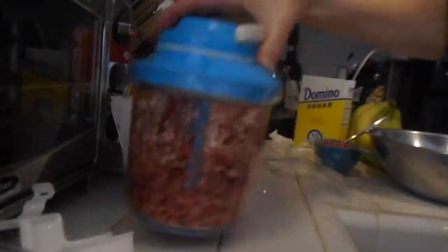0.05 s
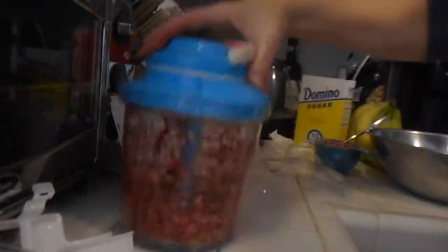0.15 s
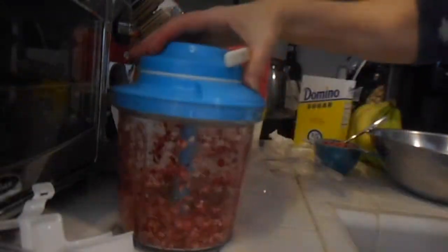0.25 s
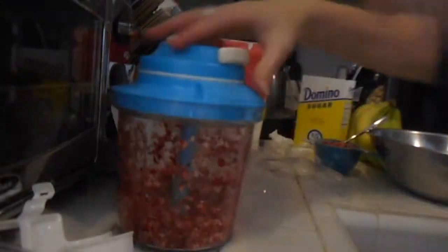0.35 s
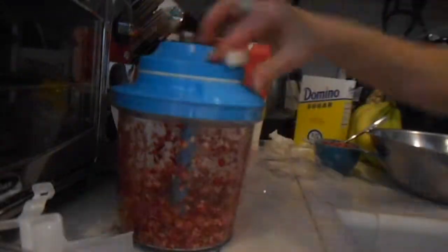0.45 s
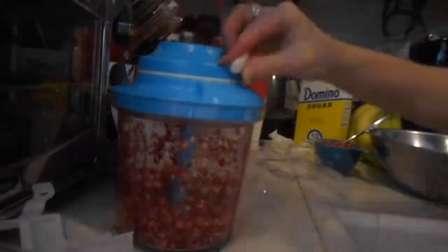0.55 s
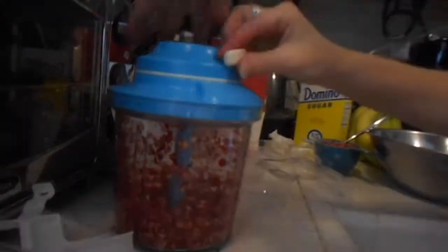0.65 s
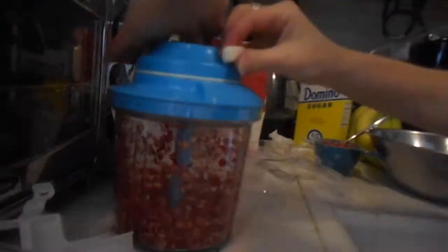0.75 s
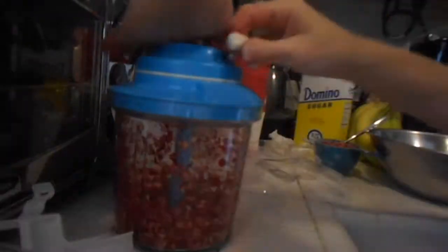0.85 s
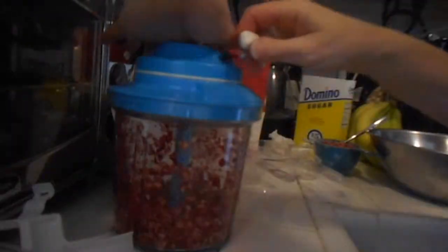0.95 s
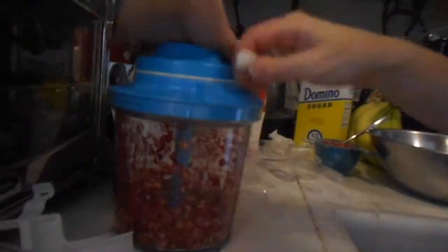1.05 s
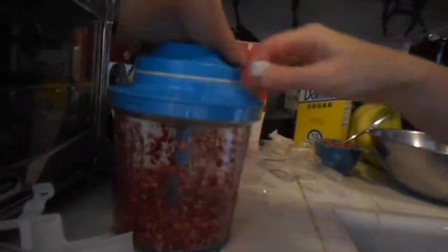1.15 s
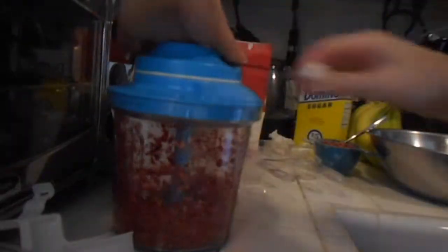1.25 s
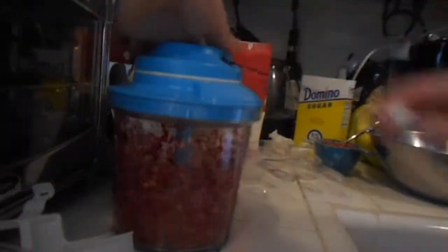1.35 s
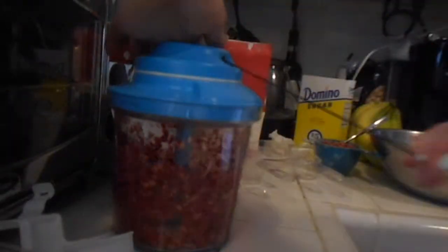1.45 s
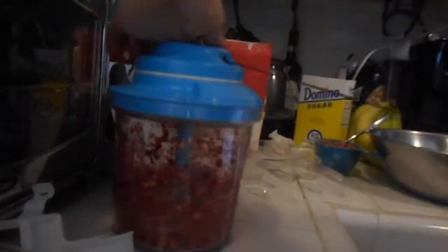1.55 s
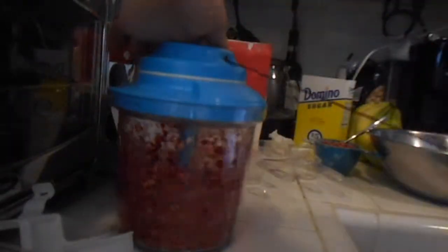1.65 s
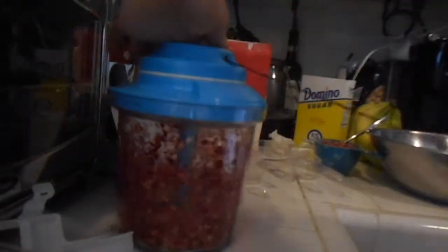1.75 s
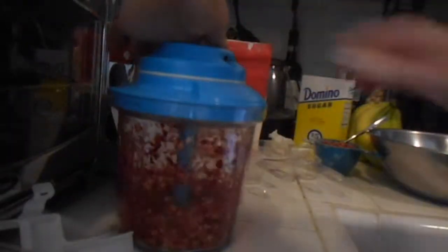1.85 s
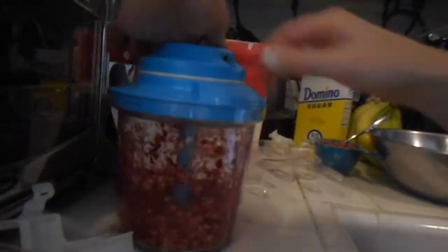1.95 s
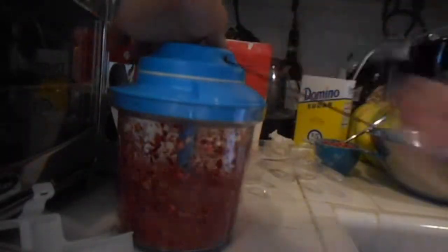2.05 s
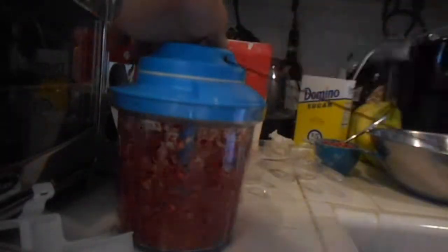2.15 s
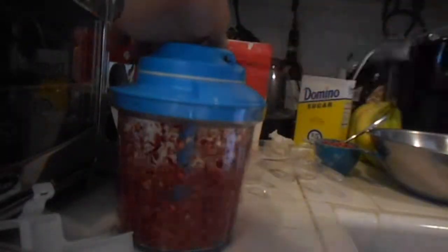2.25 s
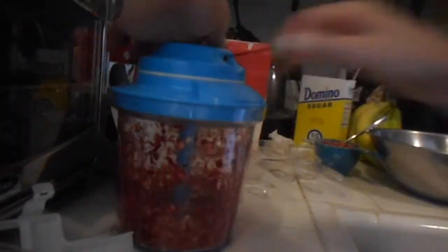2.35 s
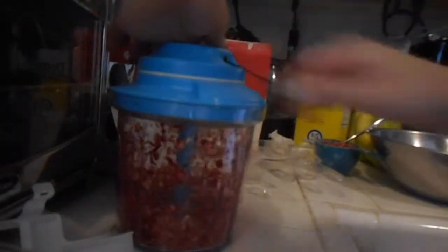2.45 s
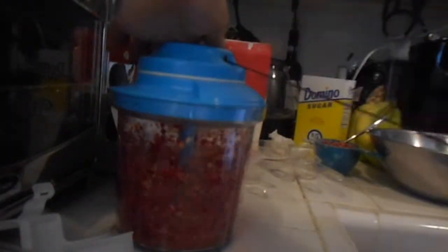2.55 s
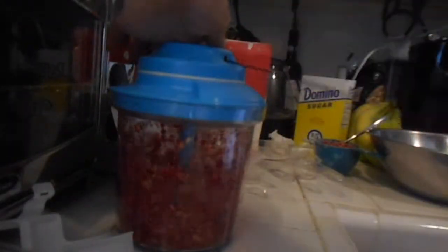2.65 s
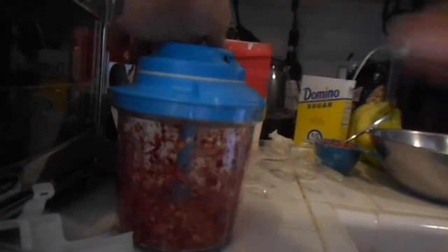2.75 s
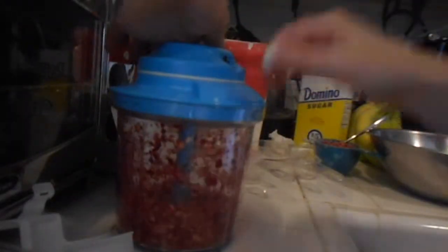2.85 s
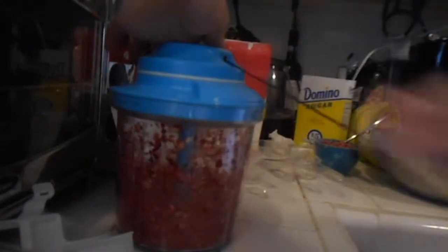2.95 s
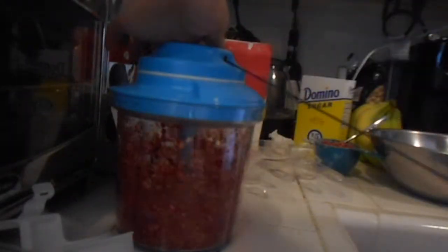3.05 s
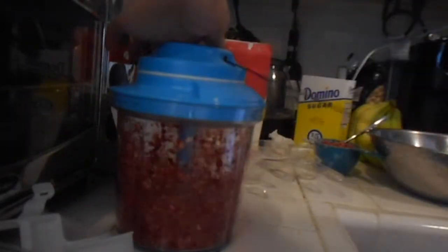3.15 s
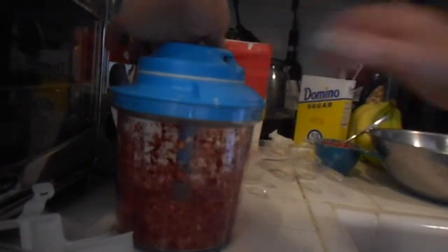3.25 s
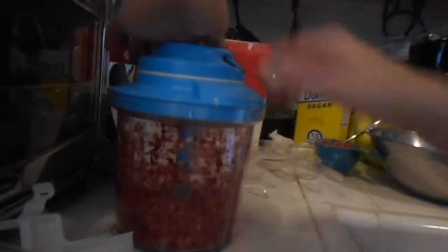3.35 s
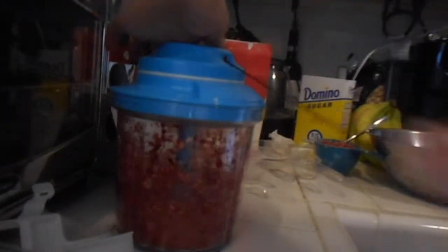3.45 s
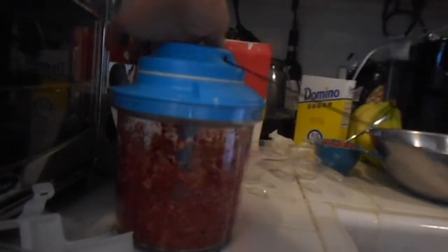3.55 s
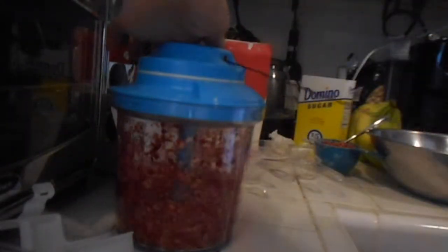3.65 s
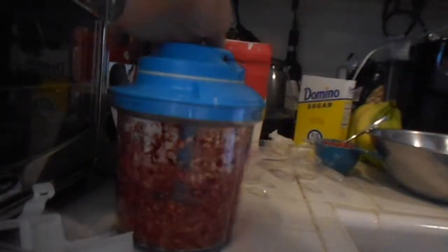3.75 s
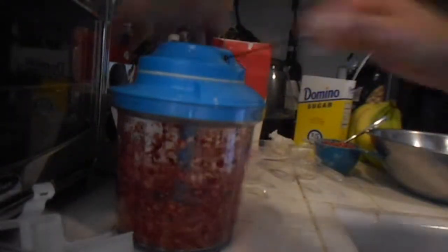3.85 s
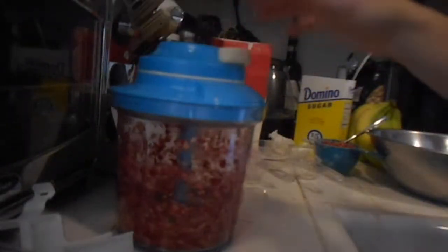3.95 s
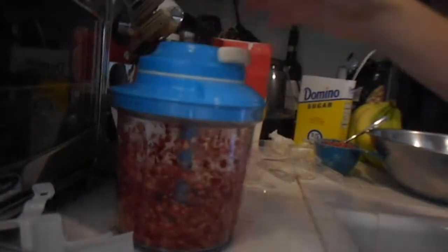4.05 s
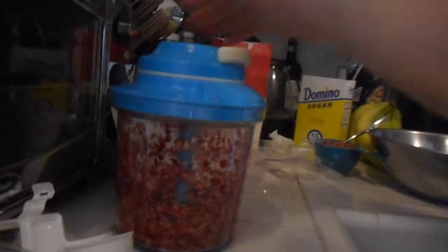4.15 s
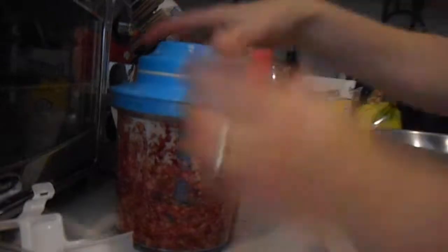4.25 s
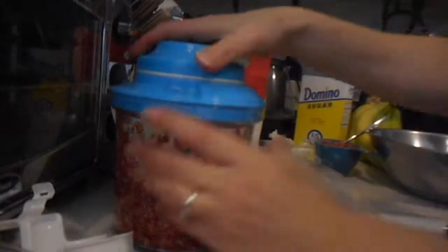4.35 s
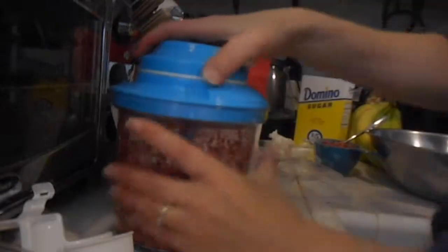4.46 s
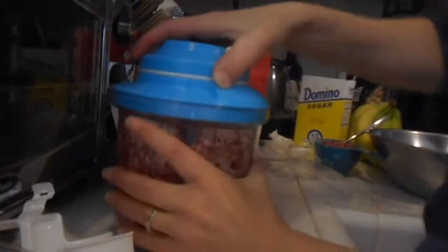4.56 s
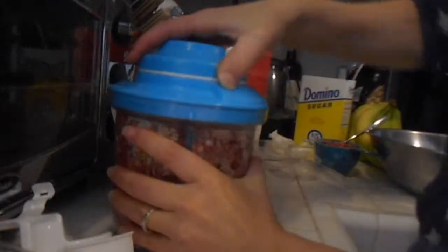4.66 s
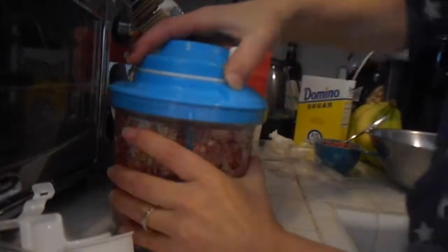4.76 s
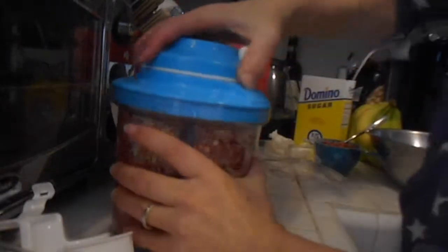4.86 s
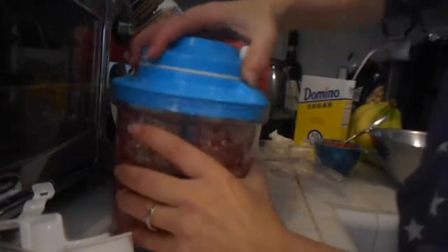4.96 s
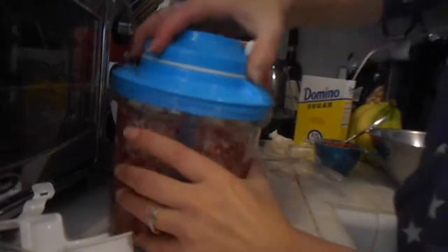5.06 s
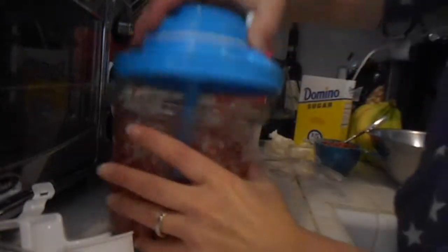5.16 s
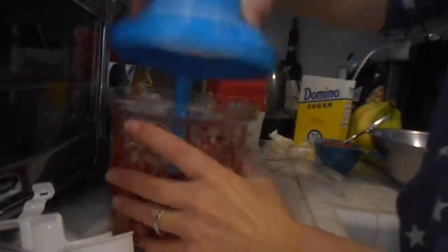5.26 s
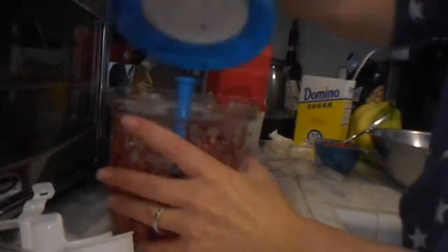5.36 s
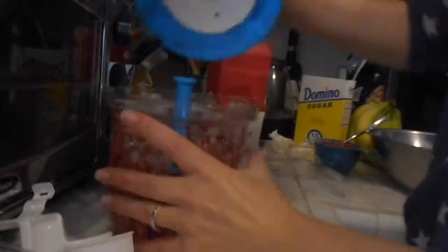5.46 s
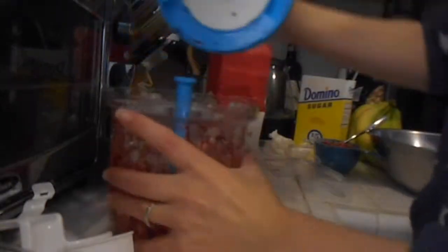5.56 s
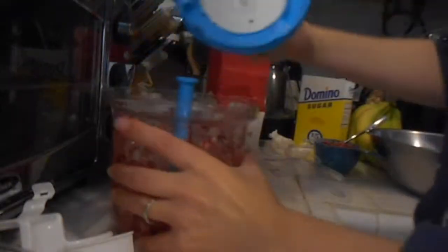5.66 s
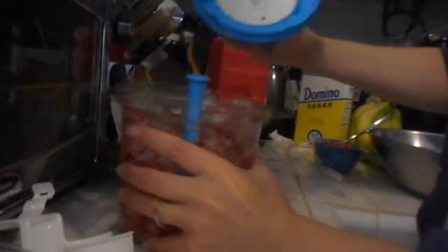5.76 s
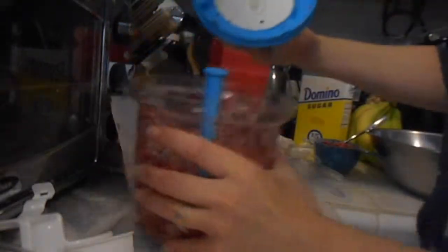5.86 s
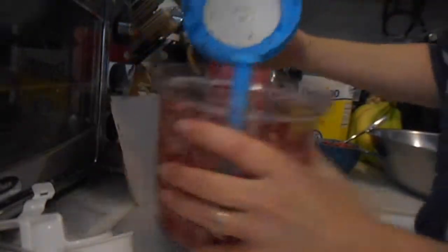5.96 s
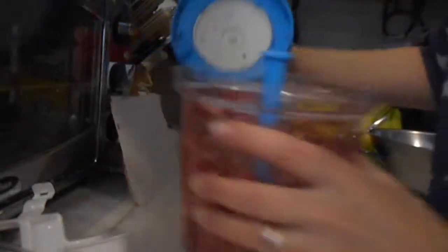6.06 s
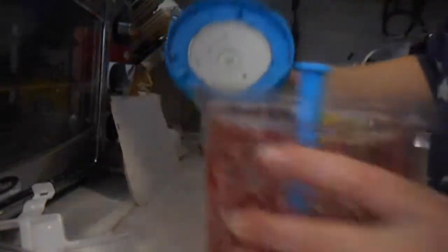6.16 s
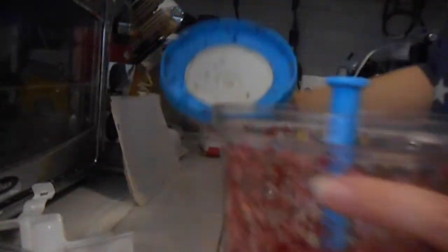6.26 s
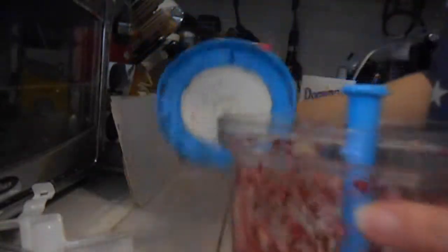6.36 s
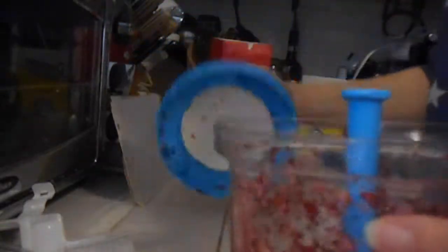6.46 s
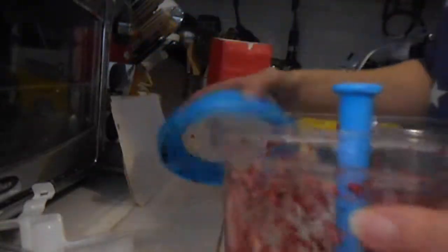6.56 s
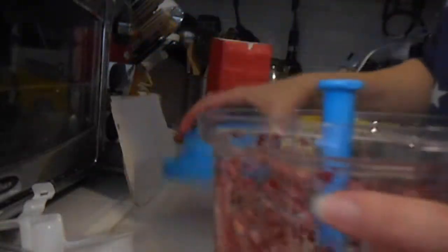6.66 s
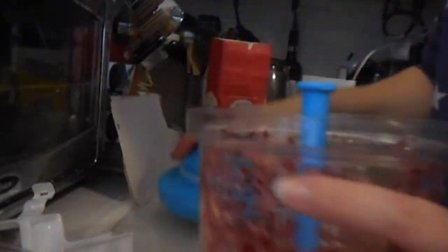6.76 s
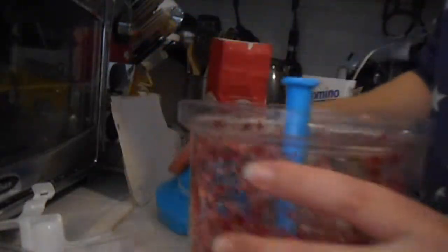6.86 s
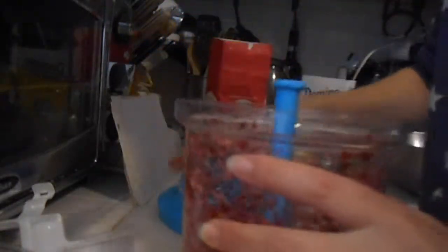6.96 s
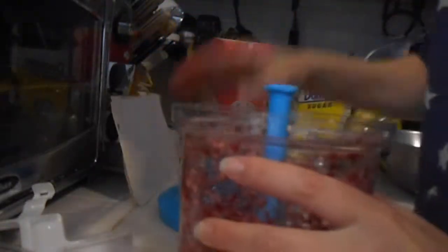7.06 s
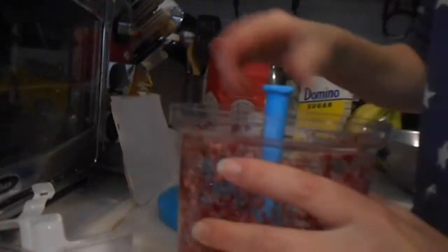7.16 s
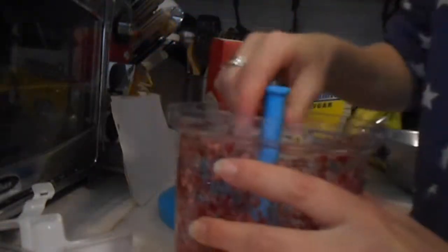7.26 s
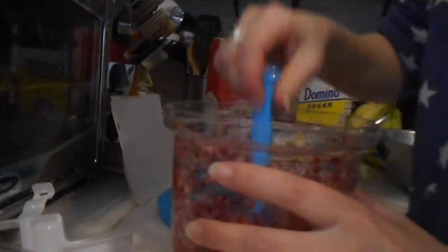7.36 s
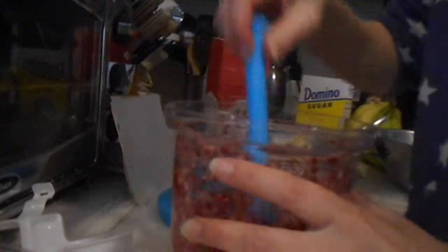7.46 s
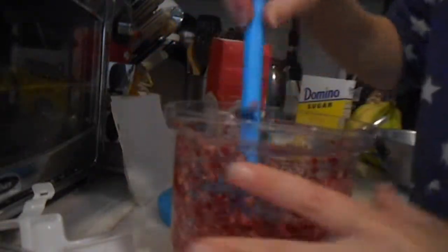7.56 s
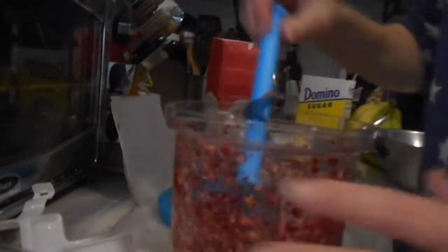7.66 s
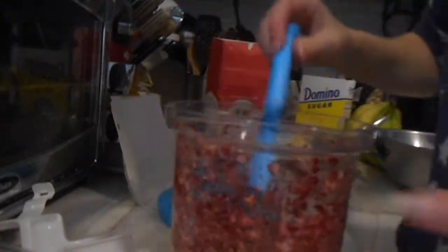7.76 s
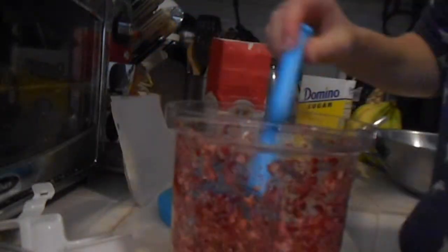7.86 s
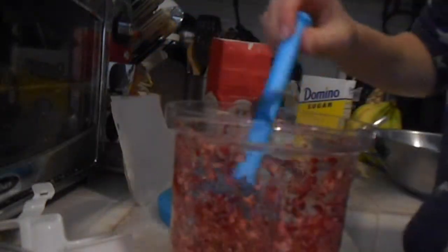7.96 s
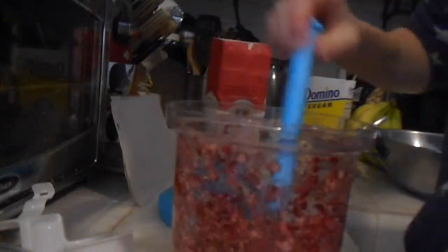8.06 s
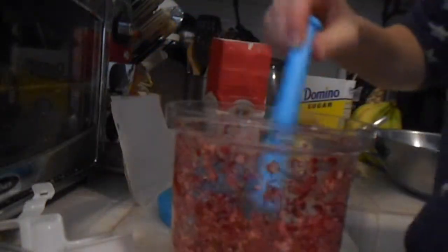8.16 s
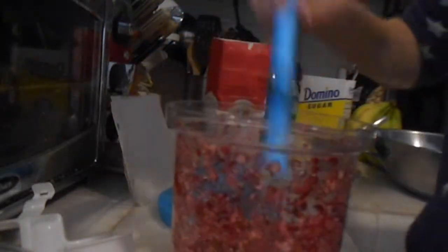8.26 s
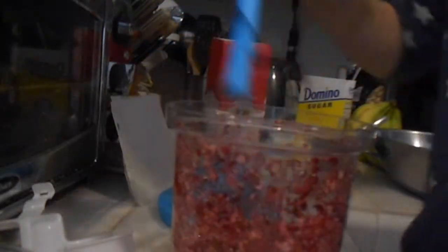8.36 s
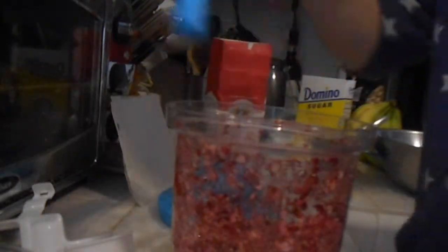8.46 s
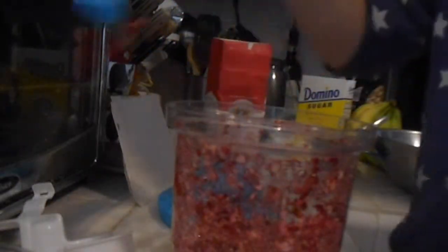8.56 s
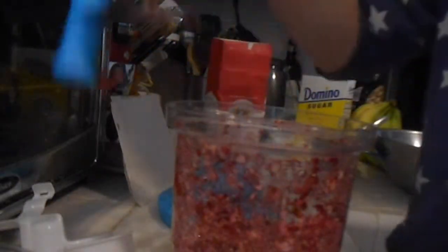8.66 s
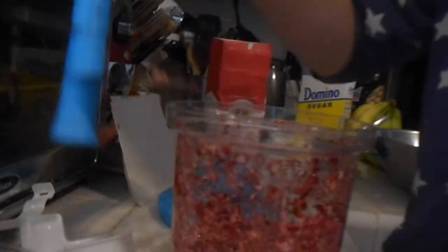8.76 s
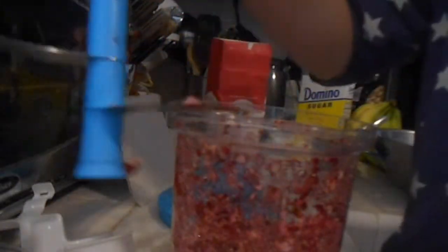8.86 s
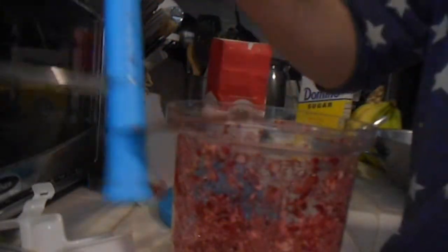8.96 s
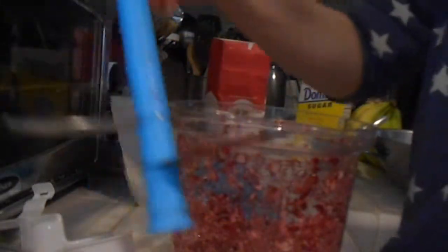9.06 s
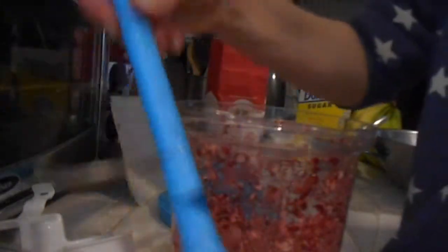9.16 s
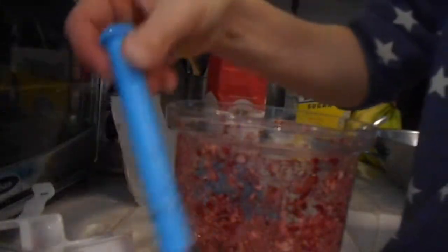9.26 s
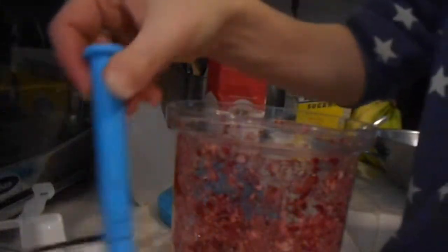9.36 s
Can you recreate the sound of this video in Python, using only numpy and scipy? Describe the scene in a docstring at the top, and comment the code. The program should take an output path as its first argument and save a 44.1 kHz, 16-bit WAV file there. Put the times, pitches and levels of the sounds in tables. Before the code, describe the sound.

Close microphone in a small quiet kitchen. A plastic pull-cord chopper is set down with a hard knock and its handle clicks. Five fast pulls give wet, gritty whirring bursts, each followed by a clattering ratchet rewind. The lid comes off with a hollow pop, is laid down with loud clacks, then the spindle raps the bowl rim seven times.

```python
"""Pull-cord food chopper

A chopper stands on a tiled kitchen counter and is pulled five times: random grains of berry hit the wall as the
blades whirl, then the cord winds back over a rattling ratchet of clicks and decaying tones. The lid is twisted off
and put down with knocks and a hollow boom, and the spindle is tapped clean on the ringing rim of the plastic bowl.
Filtered noise makes the rubbing hands and the quiet; a small room and a close microphone with a limiter complete it."""
import sys
import numpy as np
from scipy import signal
from scipy.fft import rfft, irfft
from scipy.io import wavfile
from scipy.ndimage import uniform_filter1d, minimum_filter1d, map_coordinates

SR = 44100
rng = np.random.default_rng(int(sys.argv[2]) if len(sys.argv) > 2 else 0)


def to_wav(s):
    """Save 16-bit WAV."""
    ch = np.atleast_2d(s).T  # columns
    pcm = np.round(np.clip(ch, -1, 1) * 32767)  # PCM
    wavfile.write(sys.argv[1], SR, pcm.astype(np.int16))


N = 415422
T = np.arange(N) / SR  # time in the scene, in s
AGE = T[:SR // 3]  # time since a blow, in s

# In all tables t60 is the time a sound takes to fall by 60 dB.
# pulls of the cord, the first in two tugs: (full speed at [s], hold [s], level [dB], run-up [dB per s])
PULLS = [(1.335, 0.13, -27, 111.5), (1.592, 0.13, -25, 257), (2.093, 0.076, -24, 399.5),
         (2.556, 0.081, -23, 332.5), (3.031, 0.08, -25.5, 306), (3.496, 0.13, -26, 321.5)]
# the cord winds back between a catch and a stop: (catch [s], stop [s], rattle level [dB])
REWINDS = [(1.779, 2.033, -27), (2.262, 2.478, -30), (2.723, 2.94, -29.5), (3.196, 3.434, -26.5),
           (3.694, 3.985, -28)]
# the pawl catches, the cord snags and stops, at last the handle snaps home:
# (time [s], level [dB], brightness [dB per band], ring [Hz], t60 [s])
CLACKS = [(1.783, -21, -3, 2110, 0.038), (1.791, -23, -3, 2760, 0.066), (1.804, -24, -3, 4480, 0.045),
          (1.823, -29, -2.5, 1385, 0.045), (1.849, -27.5, -3.5, 2620, 0.095),
          (1.859, -26, 0.5, 2560, 0.036), (1.868, -26.5, -1, 2460, 0.062), (1.892, -27, -5.0, 1980, 0.034),
          (1.899, -29.5, 1, 2000, 0.054), (1.924, -31, 0, 2130, 0.054), (1.952, -38, 4.5, 4810, 0.045),
          (1.966, -38, -3, 2100, 0.034), (1.998, -37, 0, 3250, 0.064), (2.031, -23.5, -1, 2830, 0.047),
          (2.261, -24, -1, 2070, 0.022), (2.289, -33.5, -3, 4500, 0.056), (2.302, -30.5, 2.0, 1850, 0.055),
          (2.336, -26.0, -2.5, 2110, 0.09), (2.366, -33, 4.5, 4300, 0.045), (2.392, -36, 1.5, 3140, 0.036),
          (2.428, -34, -3, 2760, 0.053), (2.447, -36, -2, 3140, 0.035), (2.457, -33, 0, 3060, 0.039),
          (2.482, -27.5, -1.5, 2800, 0.043), (2.495, -32.5, -6, 3130, 0.032),
          (2.725, -20.0, -1.5, 2300, 0.038), (2.758, -29, 2.5, 4780, 0.026), (2.776, -29, -2, 4670, 0.045),
          (2.79, -27.5, -1, 2660, 0.058), (2.837, -32.0, -3, 1870, 0.081), (2.86, -31, -1.5, 2550, 0.041),
          (2.875, -37.5, 4, 3100, 0.035), (2.89, -34.5, -3.5, 2560, 0.063), (2.901, -29, 1.5, 2550, 0.045),
          (2.948, -24, 0, 4620, 0.037), (3.072, -26, -4.5, 2720, 0.045), (3.192, -20.5, -1.0, 2410, 0.034),
          (3.206, -29, -10.5, 2010, 0.024), (3.22, -30.5, -9, 1020, 0.045),
          (3.246, -28.0, -1.5, 2460, 0.041), (3.259, -34, -2.5, 2570, 0.045), (3.267, -31, -1, 2560, 0.045),
          (3.308, -35, 1, 2750, 0.031), (3.322, -34.5, -0.5, 4620, 0.068), (3.365, -33, 5.5, 5220, 0.034),
          (3.384, -36.5, 1.5, 4740, 0.039), (3.422, -24.5, -1.0, 3050, 0.04), (3.703, -17, -3, 2110, 0.028),
          (3.728, -31, -4.5, 1040, 0.045), (3.738, -29.5, -6, 1860, 0.034), (3.757, -31, 4.5, 4450, 0.029),
          (3.771, -30.5, -6.5, 2080, 0.026), (3.797, -27, -4, 4440, 0.045),
          (3.816, -24.5, 1.5, 4550, 0.042), (3.844, -36.5, 8, 3800, 0.045), (3.855, -30.5, 1, 4720, 0.04),
          (3.897, -30, 1.5, 2870, 0.065), (3.914, -33.5, 1, 2150, 0.051), (3.926, -36, 1, 3720, 0.066),
          (3.944, -34, -5.5, 1840, 0.069), (3.968, -31.5, -3, 2920, 0.096), (3.99, -20.5, 3, 4050, 0.056),
          (4.003, -17.5, 2.5, 2550, 0.045), (4.013, -23.5, 2, 3880, 0.042)]
# the pull handle snaps against its seat: (time [s], pitch ratio [1], level [dB])
SNAPS = [(0.35, 0.99, -23), (4.353, 0.93, -27)]
# knocks of bowl, handle and lid, and of berry bits striking the wall during the pulls: (time [s], level [dB],
# strongest frequency [Hz], t60 [s], bowl ring relative to knock [dB], rebound relative to knock [dB])
KNOCKS = [(0.234, -12.5, 970, 0.039, -9, -11), (0.236, -15.5, 3530, 0.026, -9, -9.5),
          (0.26, -31.5, 2600, 0.058, -21, -2.5), (0.307, -37, 3500, 0.092, -17, -5.5),
          (0.694, -39, 2950, 0.048, 4, -26), (0.9, -26.5, 1800, 0.02, -2, 0.5),
          (1.357, -21.5, 1500, 0.14, -22, -10), (1.463, -31, 2400, 0.023, -13, -19),
          (1.585, -30, 2200, 0.029, -9, -16), (1.658, -22, 1570, 0.064, -8, -2),
          (4.417, -43, 2700, .015, -18, -7), (4.45, -38, 2570, 0.023, -16, -25),
          (4.579, -35.5, 2000, 0.016, -21, -18), (4.864, -22, 1060, 0.05, -8.5, -0.5),
          (4.883, -21, 2200, 0.028, -12.5, -15), (4.901, -32.5, 2400, 0.027, -11, -16),
          (5.106, -41.5, 696, 0.064, -3.5, -7.5), (5.171, -29.5, 1050, 0.15, -1.5, -9),
          (5.251, -5.5, 680, 0.043, -12, -18.5), (5.272, -30, 1000, 0.15, -18, -14),
          (5.349, -41, 600, 0.039, -20, -32), (5.751, -44, 2270, 0.051, -25, 2),
          (6.491, -41, 1660, 0.17, -22.5, -9.5), (6.623, -37, 1600, 0.045, -12, -11),
          (6.63, -27, 1750, 0.03, -21, -9), (6.649, -35, 1900, .04, -11, -16.5),
          (6.657, -29, 1800, 0.061, -16, -13), (6.924, -8, 2050, 0.04, -4.5, -8),
          (6.97, -4.5, 3450, 0.023, 7, -5.5), (7.008, -24.5, 2010, 0.089, 6.5, -5.5),
          (7.058, -33.5, 1310, 0.11, 6, -4.5), (7.114, -37, 1500, 0.046, 3, -19),
          (7.385, -48, 800, 0.085, -9, -10), (7.425, -45, 1290, 0.028, -2, -17),
          (7.476, -44.5, 440, .06, -7, -5), (7.535, -46, 750, 0.025, -5.5, -3),
          (7.583, -34.5, 2750, 0.022, 14, -12)]
# middle of each band of a knock: (frequency [Hz])
KNOCK_BANDS_HZ = (250, 750, 2400, 6000)
# single hollow tones as bowl and lid meet the counter and each other:
# (time [s], pitch [Hz], level [dB], t60 [s])
THUDS = [(0.232, 304, -7, 0.02), (0.236, 193, -43, 0.24), (0.24, 1285, -10, 0.039),
         (0.9, 491, -26.5, 0.047), (4.873, 307, -9, 0.03), (4.94, 258, -39, 0.1),
         (5.172, 306, -20.5, 0.056), (5.25, 50.4, -34, 0.06), (5.347, 524, -21, 0.044),
         (6.925, 948, -3, 0.041), (6.972, 660, -16, 0.066), (6.978, 495, -25, 0.058),
         (7.008, 1590, -19, 0.09), (7.058, 532, -32, 0.088), (7.388, 477, -28, 0.029),
         (7.473, 243, -30.5, 0.035), (7.583, 156, -49, 0.18)]
# the lid coming free thumps the air in the bowl: (time [s], level [dB])
POPS = [(5.252, -1)]
# spindle taps on the rim: (time [s], low [dB], middle [dB], crack [dB], treble [dB], wall pitch [Hz], wall [dB])
TAPS = [(7.785, -33, -23.5, -26, -35.5, 455, -23.5), (7.848, -30, -22.5, -19.5, -30.5, 532, -23),
        (7.879, -47.5, -35, -34, -46.5, 660, -31), (8.008, -28, -17.5, -15.5, -24, 655, -25.5),
        (8.089, -25, -18, -19.5, -29.5, 647, -12), (8.178, -25.5, -14.5, -17.5, -19, 645, -9.5),
        (8.257, -26, -21, -21.5, -29, 648, -14.5)]
# fingers brush the lid, and the lid scrapes off the bowl: (time [s], rise time [s], level [dB])
SCUFFS = [(0.502, 0.016, -39.5), (0.533, 0.011, -38.5), (0.561, 0.0041, -33), (0.744, 0.032, -54),
          (0.975, 0.0059, -41.5), (4.402, 0.019, -41), (4.549, 0.0068, -39.5), (5.274, .025, -44.5),
          (5.346, 0.0047, -42.5), (5.504, 0.023, -45), (5.591, 0.026, -45.5)]
# hands sliding over plastic: (time [s], length [s], level [dB], brightness [dB per band])
RUBS = [(0.35, 0.12, -64, 4), (0.516, 0.13, -54, 3), (0.749, 0.18, -54, -2), (1.035, 0.51, -52.5, 2),
        (4.041, 0.18, -55, 4.5), (4.397, 0.25, -48.5, 1.5), (4.737, 0.5, -52.5, 1.5),
        (5.17, 0.18, -53.5, -8), (5.567, 0.35, -60, 7), (7.094, 0.089, -53, 3), (7.286, 0.072, -53, 7),
        (7.45, 0.02, -56.5, 7), (7.56, 0.37, -59, -4), (8.04, 0.27, -53, 0.5), (8.38, 0.16, -56.5, -4.5),
        (8.585, 0.058, -57.5, -1.5)]
# the spindle comes down into the pulp: (time [s], level [dB])
SWISHES = [(9.108, -41.5)]

# ringing tones of the lid that houses the ratchet: (frequency [Hz], level [dB], t60 [s])
LID_MODES = [(962, -9, 0.032), (1170, -0.5, 0.042), (1407, -12, 0.069), (1721, -5, 0.0077),
             (2094, 7, 0.045), (2704, 1.5, 0.039), (3010, -5.5, 0.028), (3950, -9.5, 0.029),
             (3960, -14.5, 0.019), (4284, 7, 0.023), (4565, 10, 0.024), (4950, 10, 0.0245),
             (5940, -13, 0.03), (8470, -3.5, 0.03)]
# ringing tones of the small hard handle: (frequency [Hz], level [dB], t60 [s])
HANDLE_MODES = [(2170, -4.5, 0.06), (2350, -2, 0.04), (2960, -5, 0.03), (2920, -5, .025), (3440, -2, 0.02),
                (3840, 0, 0.022), (4240, -2.5, 0.023), (5050, -7, 0.027), (5450, -20, 0.026),
                (6800, -26, 0.021)]
# ringing tones of the filled bowl: (frequency [Hz], level [dB], t60 [s])
BOWL_MODES = [(417.6, -17.5, 0.11), (549, -1, 0.075), (659.4, -1.5, 0.08), (1080, -1.5, 0.032),
              (1184, 0, 0.052), (1645, -1, 0.065), (2228, 0.5, 0.028), (2340, -6, 0.039),
              (2687, 0.5, 0.041), (2950, -4.5, 0.022), (3220, -11.5, .025), (3584, -3, 0.036),
              (4880, -11, 0.035)]
# air and wall of the open bowl: (frequency [Hz], level [dB], t60 [s])
CAVITY_MODES = [(400, -17.5, 0.045), (533, 5, 0.042), (617, -9, 0.02), (753, -20.5, .055),
                (1010, -17.5, .08), (1238, -15, 0.099), (1426, -19, 0.03)]
# the counter drums under the tapped bowl: (frequency [Hz], level [dB], t60 [s])
COUNTER_MODES = [(156.6, -28, 0.49)]

# colour of wet berry pulp: (frequency [Hz], level [dB per Hz])
PULP = [(41, -61.5), (70, -47), (155, -21), (200, -28.5), (297, -9), (619, -8), (688, -4), (1070, -8),
        (1430, 3.5), (1660, -10), (2690, 2.5), (3310, -14), (8160, -27.5), (9860, -40.5), (10500, -49),
        (13600, -75), (22000, -120)]
# colour of the ratchet and the cord: (frequency [Hz], level [dB per Hz])
RATCHET = [(59, -60), (100, -35), (513, -3.5), (588, -11), (939, 2), (1410, -2.5), (1680, -0.5),
           (2530, 9.5), (4630, -4), (5520, -1), (8310, -7.5), (9710, -17.5), (10500, -54), (13600, -71.5),
           (22000, -120)]
# colour of knocked plastic: (frequency [Hz], level [dB per Hz])
PLASTIC = [(18, -72), (30, -38.5), (286, -6), (554, -1), (658, -5), (762, -1), (928, -3), (1630, 4),
           (6590, -1), (9290, -13), (10500, -45.5), (13600, -61.5), (22000, -120)]
# colour of the struck rim: (frequency [Hz], level [dB per Hz])
RIM = [(40, -75), (100, -16), (400, 8.5), (1100, -11.5), (2800, 12), (3700, -2), (4500, -2), (7000, -10.5),
       (9300, -22.5), (10500, -75.5)]
# colour of the short scuffs: (frequency [Hz], level [dB per Hz])
CLOTH = [(200, -36.5), (600, -6.5), (1200, -4.5), (2500, 2), (4000, -9.5), (7000, -14.5), (10000, -30.5)]
# colour of sliding skin: (frequency [Hz], level [dB per Hz])
SKIN = [(47, -55.5), (80, -29.5), (355, 2), (393, 0), (945, 0), (1280, 7.5), (1740, 1), (2620, 0.5),
        (8560, -14), (9880, -29), (10500, -40.5), (13600, -83), (22000, -120)]
# colour of the swish into the pulp: (frequency [Hz], level [dB per Hz])
SWISH = [(200, -29.5), (600, -14), (1200, 2.5), (2600, 0.5), (4200, -4.5), (5500, -17), (8000, -33),
         (11000, -50)]
# colour of the quiet kitchen: (frequency [Hz], level [dB per Hz])
KITCHEN = [(15, -36), (25, -2), (48, -9.5), (70, -8.5), (162, -4.5), (204, -6), (243, -6.5), (329, 1.5),
           (469, -1), (860, 1.5), (1700, -2.5), (2190, 1.5), (9020, -14), (10500, -35), (13600, -65),
           (22000, -120)]

PULL_FALL_DB_PER_S, PULL_SAG_DB_PER_S = 201.5, 27.5  # the blades coast to rest; the arm slows as it extends
SPRAY_DB = -6.5  # spray above 4 kHz, relative to the chopping
# the spring weakens; the rattle ends before the stop
REWIND_SAG_DB_PER_S, REWIND_FALL_DB_PER_S, SLACK_S = 33.5, 443, 0.061
RASP_DELAY_S, RASP_WIDTH_S = 0.074, 0.015  # the cord rasps through its guide just after each catch
KNOCK_SLOPE_DB_PER_OCT = 9  # fall to either side of the strongest frequency; harder contacts peak higher
REBOUND_S, REBOUND_HOLD = 0.009, 2.1  # a part rocks onto its other edge and rings longer
RUB_RISE_DB_PER_S, RUB_FALL_DB_PER_S = 343.5, 148.5
BOOM_ROOM_SHARE = 0.24  # the bowl booms right at the microphone and stirs the room little
KITCHEN_DB, TOP_HZ = -63, 10000


def chopping(blade_hz=76, churn_db=1.65, shift_db=0.96):
    """Blades throw bits of berry at the wall, in bursts at each pass; a harder pull spins them faster."""
    throb, drift = 0.2, 0.04
    effort = sum(undb(db) * stroke(s, hold, rise, PULL_FALL_DB_PER_S, PULL_SAG_DB_PER_S)
                 for s, hold, db, rise in PULLS)
    speed = (effort / effort.max()) ** 0.33
    passes = 1 + throb * np.sin(2 * np.pi * np.cumsum(blade_hz * speed) / SR)
    wall = colour(grains(per_s=4000, spread_db=2.0) * passes, PULP)
    # the churning load detunes the wall and damps it unevenly, so the colour keeps shifting
    wall = map_coordinates(wall, [np.cumsum(1 + drift * wander(0.015))], mode="mirror")
    *bands, spray = split(wall, [900, 1900, 4000])
    body = sum(b * undb(churn_db * wander(0.0069) + shift_db * wander(0.028)) for b in bands)
    return effort * (unit(body) + undb(SPRAY_DB) * unit(spray))


def rewinding(tooth_hz=70, uneven=0.5, tooth_db=0.5, tick_db=-8, ring_db=-12, slosh_db=-7, rasp_db=-1,
              grip_db_per_s=3000):
    """The pawl skips over the ratchet teeth and the cord rasps while the blades coast through the pulp."""
    turns = np.cumsum(tooth_hz * np.exp(uneven * wander(0.007))) / SR
    # each whole number passed is one tooth
    teeth = (np.diff(np.floor(turns), prepend=0) > 0) * undb(tooth_db * rng.standard_normal(N))
    tick_gain = signal.fftconvolve(teeth, fade(0.034))[:N]
    ticks = colour(tick_gain * rng.standard_normal(N), RATCHET)
    lid = signal.fftconvolve(teeth, ring(LID_MODES, scatter_db=0.5, detune=0.002))[:N]
    slosh = colour(grains(per_s=770, spread_db=5.5), PULP)
    spring = sum(undb(db) * stroke(catch, stop - catch - SLACK_S, grip_db_per_s,
                                   REWIND_FALL_DB_PER_S, REWIND_SAG_DB_PER_S)
                 for catch, stop, db in REWINDS)
    drag = sum(undb(db) * np.exp(-0.5 * ((T - catch - RASP_DELAY_S) / RASP_WIDTH_S) ** 2)
               for catch, _, db in REWINDS)
    rasp = undb(rasp_db) * drag * unit(colour(grains(per_s=3000, spread_db=2.5), RATCHET))
    rattle = undb(tick_db) * unit(ticks) + undb(ring_db) * unit(lid) + undb(slosh_db) * unit(slosh)
    return spring * rattle + rasp


def clacks(body_db=-8.0, ring_db=-2, spot_db=-1, spot_hold=0.94, lowest_hz=260, tick_db=-2, tick_t60=0.01):
    """Pawl and cord catch: a sharp tick, a dry crack and the lid's tones, coloured by the spot struck."""
    out = np.zeros(N)
    for s, db, bright, hz, t60 in CLACKS:
        spot = punch(fade(t60 * spot_hold) * np.sin(2 * np.pi * hz * AGE))
        lid = punch(ring(LID_MODES, scatter_db=1.5, detune=0.03))
        tick = crack(RATCHET, tick_t60)
        blow = crack(RATCHET, t60) + undb(ring_db) * lid + undb(spot_db) * spot + undb(tick_db) * tick
        blow *= 1 - np.exp(-AGE / 0.00089)  # soften the very start
        band_db = (db + body_db - bright, db, db + bright)
        add(out, s, balance(split(blow, [1500, 3600]), band_db))
    # the small lid radiates little bass
    return cut_bass(out, 2, lowest_hz)


def snaps(ring_db=-2, crack_db=-3, bounce_s=0.004, bounce_db=-6):
    """The handle clicks home with a hard, bright ring and chatters once."""
    out = np.zeros(N)
    for s, ratio, db in SNAPS:
        modes = [(hz * ratio, mode_db, t60) for hz, mode_db, t60 in HANDLE_MODES]
        for lag, hit_db in ((0, db), (bounce_s, db + bounce_db)):
            tone = punch(ring(modes, scatter_db=-2.0, detune=0.013))
            click = undb(ring_db) * tone + undb(crack_db) * crack(RATCHET, t60=0.036)
            add(out, s + lag, undb(hit_db) * click)
    return out


def knocks():
    """Plastic parts knock on the counter and on each other, and berry bits strike the wall during the pulls;
    each contact rebounds once."""
    out = np.zeros(N)
    for s, db, hz, t60, bowl_db, rebound_db in KNOCKS:
        add(out, s, knock(db, hz, t60, bowl_db))
        add(out, s + REBOUND_S, knock(db + rebound_db, hz, t60 * REBOUND_HOLD, bowl_db))
    return out


def knock(db, hz, t60, bowl_db, shell_db=-1.5, lid_db=-4, bass_hold=0.54):
    """One contact of plastic: the shell cracks, the lid and the bowl ring."""
    octaves_away = np.abs(np.log2(np.array(KNOCK_BANDS_HZ) / hz))
    band_db = db - KNOCK_SLOPE_DB_PER_OCT * octaves_away
    bands = split(colour(rng.standard_normal(len(AGE)), PLASTIC), [400, 1400, 4000])
    shell = [b * fade(t60 * hold) for b, hold in zip(bands, (bass_hold, 1, 1, 1))]
    bowl = undb(band_db[1] + bowl_db) * punch(ring(BOWL_MODES, scatter_db=2.0, detune=0.0029))
    lid_level_db = min(band_db[1] + 3.5, band_db[2]) + lid_db
    lid = undb(lid_level_db) * punch(ring(LID_MODES, scatter_db=8.5, detune=0.0096))
    return undb(shell_db) * balance(shell, band_db) + bowl + lid


def thuds(contact_s=0.0043):
    """Soft contacts excite only one resonance."""
    out = np.zeros(N)
    for s, hz, db, t60 in THUDS:
        add(out, s, undb(db) * hum(hz, t60, contact_s))
    return out


def lid_pop(sag=0.07, sag_s=0.03):
    """The lid jumps free and the open bowl booms; the pitch sags as the wall relaxes."""
    out = np.zeros(N)
    for s, db in POPS:
        speed = 1 - sag * (1 - np.exp(-AGE / sag_s))
        boom = ring(CAVITY_MODES, scatter_db=-2.5, detune=0.0026)
        add(out, s, undb(db) * map_coordinates(boom, [np.cumsum(speed)]))
    return out


def taps(crack_db=-0.5, bounce_s=0.0045, bounce_db=-4, damping_t60=0.4, lowest_hz=130):
    """The spindle hits the rim, bounces once and damps the bowl, which rings differently at each spot."""
    out = np.zeros(N)
    for s, *band_db, _, _ in TAPS:
        bowl = ring(BOWL_MODES, scatter_db=1, detune=0.013) * fade(damping_t60)
        counter = ring(COUNTER_MODES, scatter_db=0, detune=0.017)
        blow = punch(bowl + counter) + undb(crack_db) * crack(RIM, t60=0.014)
        add(blow, bounce_s, undb(bounce_db) * crack(RIM, t60=0.027))
        add(out, s, balance(split(blow, [800, 2000, 4000]), band_db))
    return cut_bass(out, 2, lowest_hz)


def wall_booms(t60=0.073, swell_s=0.0032):
    """Square taps also set the wall of the bowl swinging in its lowest mode."""
    out = np.zeros(N)
    for s, *_, hz, db in TAPS:
        add(out, s, undb(db) * hum(hz, t60, swell_s))
    return out


def scuffs():
    """Short strokes of coloured noise swell and fade as fingers brush and the lid scrapes."""
    out = np.zeros(N)
    for s, rise, db in SCUFFS:
        age = AGE / rise
        swell = age * np.exp(1 - age)  # reaches 1 after the rise time
        add(out, s, undb(db) * swell * unit(colour(rng.standard_normal(len(AGE)), CLOTH)))
    return out


def rubbing(rub_db=-5, scrape_db=-1, hiss_db=-5, shift_db=2.5, tick_db=-11):
    """Skin, cloth and wet plastic slide in countless small slips; loose parts tick now and then."""
    bands = split(colour(grains(per_s=2700, spread_db=-0.5), SKIN), [700, 3500])
    rub, scrape, hiss = (unit(b * undb(shift_db * wander(0.019))) for b in bands)
    ticks = unit(signal.oaconvolve(grains(per_s=15, spread_db=2.0), crack(PLASTIC, t60=0.02))[:N])
    middle = undb(scrape_db) * scrape + undb(tick_db) * ticks
    out = np.zeros(N)
    for s, length, db, bright in RUBS:
        slide = undb(rub_db - bright) * rub + middle + undb(hiss_db + bright) * hiss
        out += undb(db) * stroke(s, length, RUB_RISE_DB_PER_S, RUB_FALL_DB_PER_S) * slide
    return out


def swishes(rise_s=0.015, t60=0.36):
    """A soft swish of fading noise as the spindle comes back down into the pulp."""
    out = np.zeros(N)
    for s, db in SWISHES:
        swell = np.minimum(AGE / rise_s, 1) * fade(t60)
        add(out, s, undb(db) * swell * unit(colour(rng.standard_normal(len(AGE)), SWISH)))
    return out


def kitchen_quiet():
    """Steady coloured noise is the quiet of the kitchen."""
    return undb(KITCHEN_DB) * unit(colour(rng.standard_normal(N), KITCHEN))


def room(x, low_t60=0.7, mid_t60=0.42, high_t60=0.27, wet_db=-20):
    """Tiles and cupboards answer with a short diffuse tail; the treble dies first."""
    t = T[:SR]
    bands = split(rng.standard_normal(SR), [500, 4000])
    tail = sum(b * np.exp(-np.log(1000) * t / t60) for b, t60 in zip(bands, (low_t60, mid_t60, high_t60)))
    tail *= 1 - np.exp(-t / 0.0094)
    return x + undb(wet_db) * signal.fftconvolve(x, tail / np.linalg.norm(tail))[:N]


def undb(db):
    """Decibels to gain."""
    return 10 ** (np.asarray(db) / 20)


def unit(x):
    """Scale to an average strength (rms) of 1."""
    return x / np.sqrt(np.mean(x ** 2))


def punch(x):
    """Scale a blow so that its first 8 ms have rms 1."""
    return x / np.sqrt(np.mean(x[:SR // 125] ** 2))


def fade(t60):
    """Exponential decay by 60 dB in t60 seconds."""
    return np.exp(-np.log(1000) * AGE / t60)


def add(out, s, x):
    """Mix x in at time s."""
    i = int(s * SR)
    out[i:i + len(x)] += x[:len(out) - i]


def colour(x, points):
    """Filter with the given spectrum; it never sounds before its input (minimum phase)."""
    hz, db = np.transpose(points)
    grid = np.fft.rfftfreq(1024, 1 / SR)
    cepstrum = irfft(np.log(undb(np.interp(np.log(grid + 1), np.log(hz), db))))
    # fold the second half onto the first, so that the filter only looks back
    half = len(cepstrum) // 2
    cepstrum[1:half] *= 2
    cepstrum[half + 1:] = 0
    return signal.fftconvolve(x, irfft(np.exp(rfft(cepstrum))))[:len(x)]


def split(x, edges_hz):
    """Cut a sound into adjoining bands."""
    bands = [(edges_hz[0], "low")]
    bands += [(pair, "band") for pair in zip(edges_hz, edges_hz[1:])]
    bands += [(edges_hz[-1], "high")]
    return [signal.sosfilt(signal.butter(4, e, kind, fs=SR, output="sos"), x) for e, kind in bands]


def cut_bass(x, order, hz):
    """Weaken everything below hz."""
    return signal.sosfilt(signal.butter(order, hz, "high", fs=SR, output="sos"), x)


def balance(bands, band_db):
    """Give each band of a blow its strength."""
    return sum(undb(db) * punch(b) for b, db in zip(bands, band_db))


def ring(modes, scatter_db, detune):
    """Decaying tones; every blow lands on another spot and weights them anew."""
    chance = rng.standard_normal((len(modes), 3))
    out = np.zeros(len(AGE))
    for (hz, db, t60), (louder, sharper, side) in zip(modes, chance):
        tone = np.cos(2 * np.pi * hz * (1 + detune * sharper) * AGE)
        out += np.sign(side) * undb(db + scatter_db * louder) * fade(t60) * tone
    return out


def hum(hz, t60, swell_s):
    """One resonance that swells softly and decays."""
    return (1 - np.exp(-AGE / swell_s)) * fade(t60) * np.sin(2 * np.pi * hz * AGE)


def crack(points, t60):
    """The dense, quickly damped upper tones of a plastic shell, made of fading noise."""
    return punch(colour(rng.standard_normal(len(AGE)) * fade(t60), points))


def grains(per_s, spread_db):
    """Random tiny impacts of uneven size."""
    size = undb(spread_db * np.minimum(rng.exponential(size=N), 4))
    return unit((rng.random(N) < per_s / SR) * size * rng.choice([-1, 1], N))


def wander(span_s):
    """Smooth random drift with spread 1."""
    size = int(span_s * SR)
    return unit(uniform_filter1d(uniform_filter1d(rng.standard_normal(N), size), size))


def stroke(s, hold, rise, fall, sag=0):
    """Gain of one movement: it rises until s, sags while held, then falls; slopes in dB per s."""
    t = T[::SR // 1000]  # a coarse grid is enough
    db = rise * np.minimum(t - s, 0) - sag * np.clip(t - s, 0, hold) - fall * np.maximum(t - s - hold, 0)
    return np.interp(T, t, undb(np.maximum(db, -200)))


def scene():
    """The chopper and its handling over the quiet of the kitchen."""
    boom = lid_pop() + wall_booms()
    chopper = chopping() + rewinding() + clacks() + snaps() + knocks() + thuds() + taps()
    in_room = room(chopper + BOOM_ROOM_SHARE * boom + scuffs())
    close = (1 - BOOM_ROOM_SHARE) * boom + rubbing() + swishes()
    return (in_room + close + kitchen_quiet())[None]


def record(dry, ceiling=0.72):
    """A fast limiter holds peaks down, the input stage rounds what is left; rumble and the top are cut."""
    hold = SR // 400  # 2.5 ms
    gain = ceiling / np.maximum(np.abs(dry), ceiling)
    held = dry * uniform_filter1d(minimum_filter1d(gain, hold), hold)
    rounded = held / (1 + (held / 0.58) ** 6) ** (1 / 6)
    thin = cut_bass(rounded, 1, 40)
    return signal.sosfilt(signal.ellip(10, 0.2, 70, TOP_HZ, fs=SR, output="sos"), thin)


dry = scene()
out = record(dry)
to_wav(out)
```